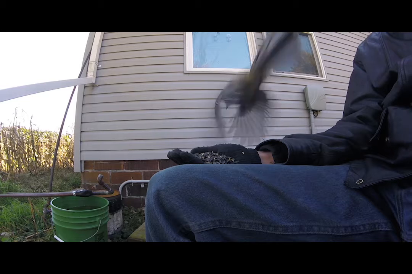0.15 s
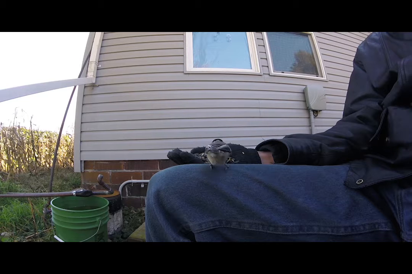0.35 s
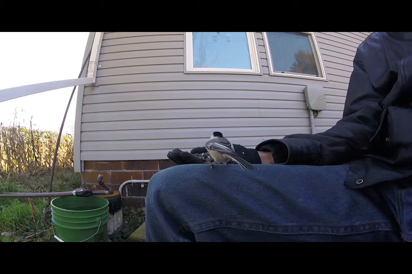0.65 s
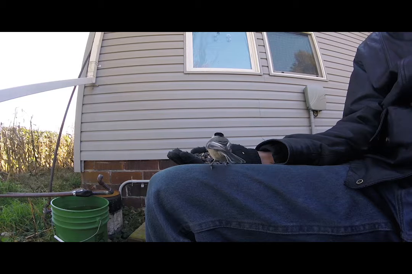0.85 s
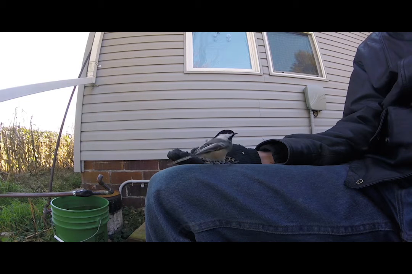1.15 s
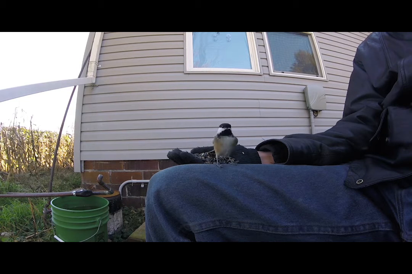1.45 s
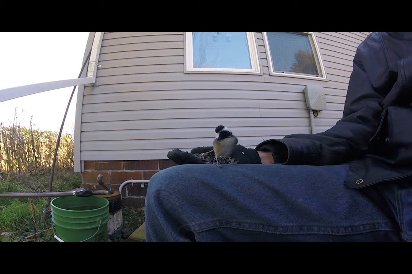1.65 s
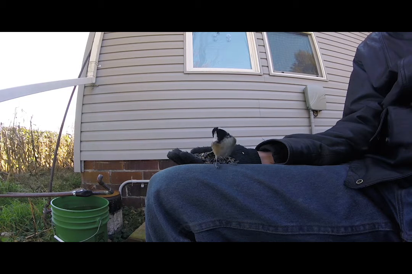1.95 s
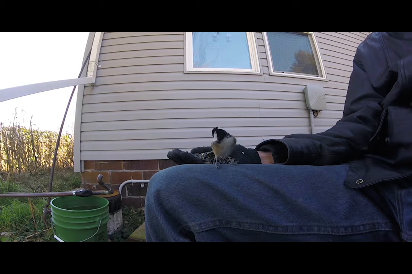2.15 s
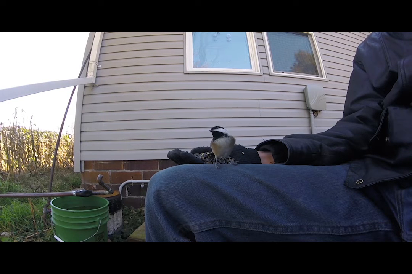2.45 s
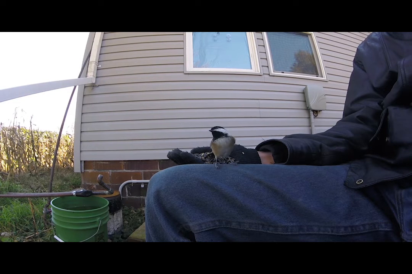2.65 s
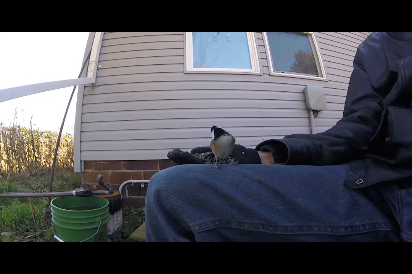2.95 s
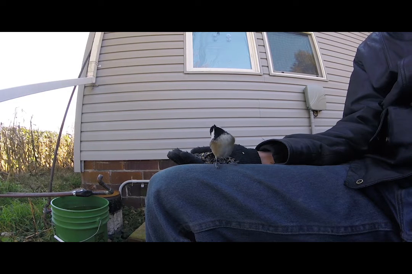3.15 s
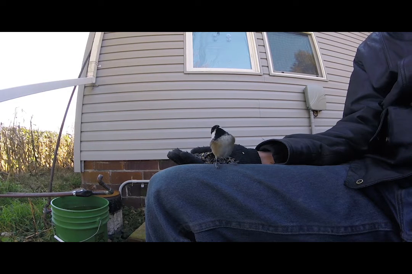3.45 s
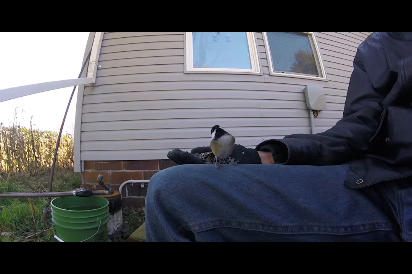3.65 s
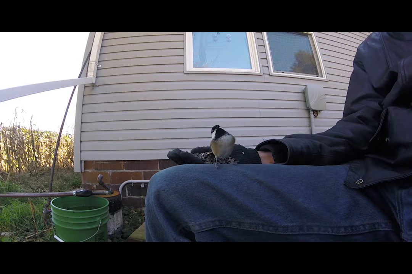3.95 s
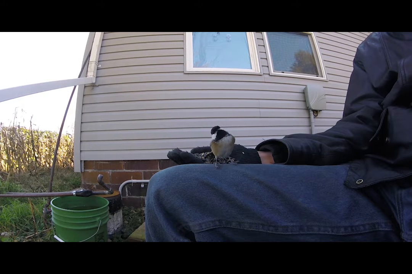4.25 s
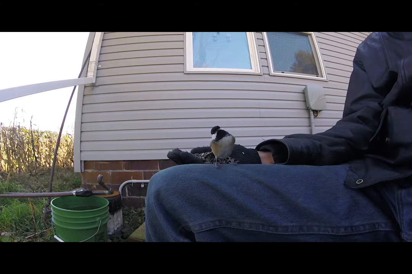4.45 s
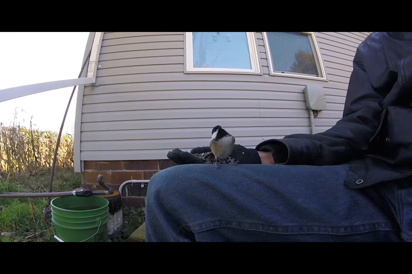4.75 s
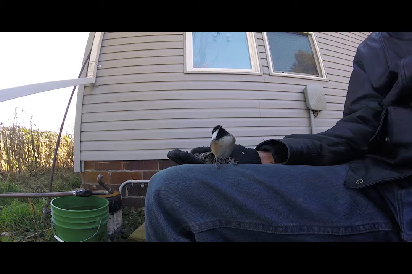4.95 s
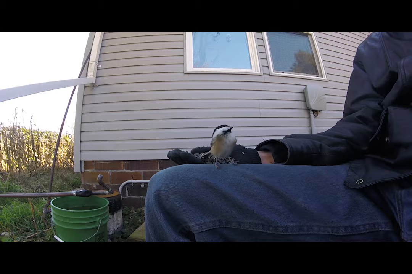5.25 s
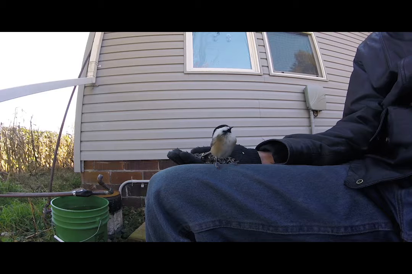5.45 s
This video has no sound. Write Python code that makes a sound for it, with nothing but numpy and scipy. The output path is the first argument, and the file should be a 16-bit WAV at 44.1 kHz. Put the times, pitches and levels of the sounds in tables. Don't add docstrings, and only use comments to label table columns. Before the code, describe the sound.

A soft flutter and bump near the microphone, followed by a bright fast bird trill and a long run of sharp, echoing chips in a quiet yard.

```python
import sys
import numpy as np
from scipy import signal
from scipy.fft import rfft, irfft, next_fast_len
from scipy.io import wavfile
from scipy.ndimage import uniform_filter1d, map_coordinates

SR = 44100
rng = np.random.default_rng(int(sys.argv[2]) if len(sys.argv) > 2 else 0)


def output_pcm(signal):
    pcm = np.clip(np.atleast_2d(signal).T, -1, 1) * 32767
    wavfile.write(sys.argv[1], SR, np.round(pcm).astype(np.int16))


def boost_factor(decibels):
    exponent = np.asarray(decibels, float) / 20
    return 10 ** exponent


N = 247401


def unit(x):
    return x / np.sqrt(np.mean(x ** 2) + 1e-20)


def filtered(x, response):
    m = next_fast_len(len(x) + 8192)
    return irfft(rfft(x, m) * response(np.fft.rfftfreq(m, 1 / SR)), m)[:len(x)]


def add(track, sound, s):
    start = max(round(s * SR), 0)
    track[start:start + len(sound)] += sound[:len(track) - start]


def glide(shape):
    s, hz, db = np.transpose(shape)
    t = np.arange(s[0], s[-1], 1 / SR)
    pitch = uniform_filter1d(np.exp(np.interp(t, s, np.log(hz))), size=45)
    return 2 * np.pi * np.cumsum(pitch) / SR, np.interp(t, s, db)


def whistle(shape, harmonic=1):
    phase, db = glide(shape)
    window = signal.windows.tukey(len(db), min(1, 130 / len(db)))
    return np.sqrt(2) * boost_factor(db) * np.sin(harmonic * phase) * window


def rough(note, depth_db, rate):
    knots = rng.standard_normal(200)
    return note * boost_factor(depth_db * map_coordinates(knots, [np.arange(len(note)) / SR * rate]))


# delay_s, level_db
WALL_RETURNS = [(.0112, -7.5), (.021, -10)]


def echoed(note, near_db, near_t60, far_db, far_t60, wall_db=-12, direct_db=0):
    t = np.arange(SR // 4) / SR
    draw = rng.standard_normal((2, len(t)))
    near = draw[0] * (abs(draw[0]) > 1.9) * boost_factor(-60 * t / near_t60) * (t > .002)
    far = draw[1] * boost_factor(-60 * t / far_t60) * (t > .008)
    paths = boost_factor(near_db) * near / np.linalg.norm(near) + boost_factor(far_db) * far / np.linalg.norm(far)
    paths[0] = boost_factor(direct_db)
    for delay, db in WALL_RETURNS:
        paths[round(delay * SR)] += boost_factor(db + wall_db)
    return signal.fftconvolve(note, paths)


# frequency_hz, density_db (per Hz)
YARD_SPECTRUM = [(12, -57), (22, -3), (38, -0.5), (58, 1), (90, -11.5), (130, -13), (200, -21),
                 (400, -25.5), (900, -28), (2500, -34.5), (4300, -41.5), (6500, -38.5), (9000, -39),
                 (10300, -45), (12000, -42.5), (14500, -50)]
# time_s, rumble_db
TRAFFIC_SWELL = [(0, 7), (.8, -1.5), (1.5, -1.5), (2.3, 0), (3, -0.5), (3.8, 0.5), (4.6, 2), (5.6, -1)]
# pitch_hz, level_db (rms)
MACHINE_HUM = [(734, -82), (856, -80), (979, -82)]


def yard():
    level_db, rumble_top_hz = -51.5, 160
    z = signal.stft(rng.standard_normal(N + 512), nperseg=512)[2]
    patches = uniform_filter1d(uniform_filter1d(rng.standard_normal(z.shape), 6, 0), 12, 1)
    noise = signal.istft(z * boost_factor(0.95 * unit(patches)), nperseg=512)[1][:N]
    hz, db = np.transpose(YARD_SPECTRUM)
    t = np.arange(N) / SR
    hum = sum(np.sqrt(2) * boost_factor(line_db) * np.sin(2 * np.pi * line_hz * t) for line_hz, line_db in MACHINE_HUM)
    air = unit(filtered(noise, lambda f: boost_factor(np.interp(np.log(f + 1), np.log(hz), db))))
    rumble = filtered(air, lambda f: 1 / (1 + (f / rumble_top_hz) ** 4))
    swell = boost_factor(np.interp(t, *np.transpose(TRAFFIC_SWELL)))
    return boost_factor(level_db) * (air + rumble * (swell - 1)) + hum


# peak_s, peak_db, pitch_hz, width_s
WING_GUSTS = [
    (.005, -26, 47, 0.017),
    (.038, -31.5, 49, 0.026),
    (0.111, -30, 26.6, 0.012),
    (0.228, -21.5, 29, 0.024),
    (0.281, -34.5, 29.3, 0.074),
    (0.344, -27, 86, 0.0094),
    (0.369, -31, 32, 0.023),
    (4.389, -32.5, 50.5, 0.014),
    (4.361, -42.5, 122.3, 0.0084),
    (4.56, -56, 54.4, 0.013),
]
# peak_s, level_db, centre_hz
FEATHER_BRUSHES = [(0.01, -37.5, 97), (0.094, -45.5, 86), (.189, -57, 133), (0.222, -42, 112),
                   (.09, -59.5, 453), (.217, -60, 400), (0.279, -59.5, 635), (0.255, -48, 89.5),
                   (0.287, -46, 84.5), (0.329, -52.5, 177), (0.34, -43.5, 124), (4.364, -51.5, 182)]
# peak_s, level_db, length_s, centre_hz
SEED_RUSTLES = [(.003, -61.5, 0.0052, 1840), (0.092, -64, 0.01, 1440), (0.195, -55, 0.00406, 1100),
                (0.205, -64.5, 0.01, 4400), (0.273, -51, 0.00023, 2300), (0.281, -56.5, 0.0026, 3180),
                (0.742, -65, 0.001, 4870), (0.849, -59.5, 0.0088, 3750), (0.882, -64, 0.018, 2940),
                (1.027, -60, 0.008, 3470), (1.288, -63, 0.0046, 2800), (2.886, -60, .002, 2800),
                (5.085, -64, 0.0024, 4008), (5.21, -70, 0.0018, 4000)]


def landing():
    brush_s = 0.012
    out, t = np.zeros(N), np.arange(N) / SR
    for s, db, hz, width in WING_GUSTS:
        out += boost_factor(db) * np.exp(-((t - s) / width) ** 2 / 2) * np.cos(2 * np.pi * hz * (t - s))
    t = t[:SR // 6]
    brushes = [(s, db, brush_s, hz) for s, db, hz in FEATHER_BRUSHES]
    for s, db, length, hz in brushes + SEED_RUSTLES:
        band = lambda f: np.exp(-(np.log((f + 1) / hz) / 0.61) ** 2)
        burst = unit(filtered(rng.standard_normal(len(t)), band))
        add(out, boost_factor(db) * burst * t / length * np.exp(1 - t / length), s - length)
    return out


# time_s, pitch_hz, level_db
PLUNGE_SHAPE = [(-.0035, 6753, 2.5), (-.0025, 6340, -2), (-.001, 5006, -3.5), (0, 4220, -9),
                (.0015, 3100, -1), (.004, 2404, -10)]


def swoop(plunge_db, hold_db, hz, sag, shape, throat, length, overtones_db, drop_db, top_hz, lower_db, upper_db):
    hold_middle_s, hold_half_s, drop_from_s = 0.038, 0.0227, .08
    s, ratio, db, loss_db = np.transpose(shape)
    ratio = ratio - sag / hz * np.clip(s - hold_middle_s, -hold_half_s, hold_half_s)
    s, db = s * length, db + drop_db * (s > drop_from_s)
    throat_hz, throat_db = np.transpose(throat)
    first_s, first_hz = PLUNGE_SHAPE[0][:2]
    note = 0
    for k in range(5):
        top = []
        for at, f, level in PLUNGE_SHAPE:
            raised_hz = f + (top_hz - first_hz) * (at / first_s) ** 2 * (at < 0)
            top.append((at, raised_hz, level + plunge_db + lower_db * (at >= 0) if k == 0 else -110))
        top[-1] = (*top[-1][:2], hold_db + 5.5 if k == 0 else -110)
        colour_db = np.interp(np.log((k + 1) * ratio * hz), np.log(throat_hz), throat_db)
        voice_db = overtones_db * (k > 0) + upper_db * (k > 2) - k * loss_db + colour_db
        tone = whistle(top + list(zip(s, ratio * hz, hold_db + db + voice_db)), harmonic=k + 1)
        note = note + rough(rough(tone, depth_db=1.2, rate=60), depth_db=1.5, rate=400)
    return note


# start_s, plunge_db, hold_db, hold_hz, sag_hz_per_s
SWOOP_CALLS = [(0.9245, -40, -75, 1840, 3003), (0.996, -41, -88, 1980, 3000),
               (1.063, -43, -62.5, 1840, 2193), (1.215, -42.5, -60, 1862, 2198),
               (1.3028, -42.5, -63.5, 1844, 3505), (1.3663, -41, -58.5, 1928, 399),
               (1.459, -43.5, -56, 1817, 4497), (1.6129, -40, -57, 1820, 3489),
               (1.7712, -41.5, -55.5, 1876, 2996), (1.9278, -44, -58.5, 1910, 2506),
               (2.088, -43.5, -56.5, 1897, 3498), (2.2445, -40.5, -57, 1863, 2995),
               (2.951, -43.5, -59, 1788, -400), (3.1518, -39, -75, 1970, 1003),
               (3.2315, -44, -58, 1896, 782), (3.3954, -45.5, -58, 1948, 1498),
               (3.5653, -42, -58, 1953, 1815), (3.727, -40.5, -60, 1990, 1802),
               (3.886, -41, -58.5, 1958, 1788), (4.044, -37.5, -56.5, 2032, 1496),
               (4.212, -43.5, -57.5, 1980, 2606)]
# length_ratio, overtones_db, final_drop_db
SWOOP_VOICES = [(1, 2, 0), (1, 0, 2), (0.902, -1, 5), (.98, 1.5, 3), (1, 0, 4), (0.999, -1, 0),
                (0.998, -3, -3), (1, -4, 0), (0.998, -3.5, -2), (1, -6, -7), (1, -8, -12), (1, -8, -9),
                (.78, -1.5, 0), (1, -8, 0), (1, 1, -4), (1, 0.5, -3), (1, -0.5, -4), (1, -0.5, 4),
                (0.999, -1, -2), (1.002, 0, -2), (1, 0, 0)]
# top_hz, lower_half_db, upper_overtones_db
PLUNGE_RUNS = [(8300, -8, 0), (7300, -7, 0), (6800, -6, -6), (6800, -2, 0), (6800, -4, -4), (6900, -2, 0),
               (6700, -3, -8), (6700, -4, -8), (6700, -6, -6), (6700, -4, -8), (6700, -5, -8),
               (6700, -5, -8), (6400, -4, -9), (7600, -5, 0), (6700, -3, -7), (6700, -3, -4),
               (6700, -3, -4), (6700, -3, -4), (6700, -3, -4), (6700, -3, -3), (6600, -3, -7)]
# time_s (from the plunge), pitch_ratio, level_db, loss_db (per overtone)
FIRST_HOLD = [(.01, 1.09, 1.5, 3.5), (.02, 1.015, 3.5, 8.5), (.04, 1.001, 2, 10.5), (.065, .99, -2.5, 4.5),
              (.072, .91, -2.5, 3.5), (.077, .75, -2, 2.5), (.085, .67, -9.5, 10), (.104, .63, -15, -2.5),
              (.109, 0.43, -16, 2)]
LATER_HOLD = [(.009, 1.06, 9.5, 11), (.018, 1.005, 2.5, 5.7), (.04, 1.001, 0, 2.5), (.066, .99, -1.5, 1.75),
              (.07, .95, 2.5, 1.4), (.076, .82, 1, 4), (.086, .69, 1.5, 7.4), (.091, 0.695, 7, 6.5)]
# frequency_hz, gain_db
FIRST_THROAT = [(1000, 4), (1900, -2.2), (2600, 9.5), (3700, -0.5), (4800, 10.5), (5600, 2), (7500, 11),
                (9500, 0)]
# frequency_hz, gain_db
LATER_THROAT = [(1300, -6.5), (1600, -21), (1830, -4), (2700, 3), (3900, -3), (5600, 0), (7500, 3),
                (9800, -6)]
# start_s, level_db
SWOOP_HOOKS = [
    (1.545, -60),
    (1.7, -62),
    (1.857, -63),
    (2.012, -59),
    (2.17, -60.5),
    (2.332, -58),
]
# time_s, pitch_hz, level_db
HOOK_COURSE = [(-.003, 2570, -8), (.002, 2213, 2.5), (.008, 1980, 1), (.016, 1900, -9), (.021, 1910, -16)]


def swoops():
    ground_s, ground_db = 0.0049, -8
    out = np.zeros(N)
    space = dict(near_db=-7.5, near_t60=0.03, far_db=-12, far_t60=0.41)
    for (s, *call), voice, run in zip(SWOOP_CALLS, SWOOP_VOICES, PLUNGE_RUNS):
        bird = (FIRST_HOLD, FIRST_THROAT) if s < N / SR / 2 else (LATER_HOLD, LATER_THROAT)
        start = s + PLUNGE_SHAPE[0][0]
        add(out, echoed(swoop(*call, *bird, *voice, *run), **space), start)
        add(out, boost_factor(ground_db + call[0]) * whistle(PLUNGE_SHAPE[:4]), start + ground_s)
    for s, db in SWOOP_HOOKS:
        add(out, boost_factor(db) * echoed(whistle(HOOK_COURSE), **space), s + HOOK_COURSE[0][0])
    return out


# start_s, length_s, level_db, lowest_hz, swing_hz, blur_hz
BUZZ_CALLS = [
    (1.107, 0.086, -50, 6530, 2380, 145),
    (2.494, 0.068, -59.5, 7400, 2040, 700),
    (2.996, 0.15, -61.5, 7360, 2250, 830),
    (3.503, 0.09, -59.5, 7160, 2310, 680),
    (1.91, 0.051, -68.5, 7260, 3360, 604),
    (4.661, 0.066, -64.5, 7760, 1835, 583),
]


def buzzes():
    rate = 80
    out = np.zeros(N)
    for s, length, db, hz, swing_hz, blur_hz in BUZZ_CALLS:
        t = np.arange(0, length, 1 / SR)
        cycle = (rate * t) % 1
        size = boost_factor(3 * rng.standard_normal(30))[(rate * t).astype(int)]
        blur = blur_hz * unit(uniform_filter1d(rng.standard_normal(len(t)), size=60))
        pitch = hz + swing_hz * cycle ** 1.1 + blur
        sweep = np.sin(2 * np.pi * np.cumsum(pitch) / SR) * np.sin(np.pi * cycle ** .4) ** 2
        swell = np.sin(np.pi * t / length) ** .4
        call = boost_factor(db) * size * swell * rough(sweep, depth_db=5, rate=500)
        add(out, echoed(call, near_db=-2.5, near_t60=.1, far_db=-3, far_t60=.3), s)
    return out


# start_s, fall_db, rise_db, rise_hz
TRILL_SYLLABLES = [(1.5238, -36.5, -32, 4486), (1.5904, -28, -29, 4520), (1.654, -27, -30, 4450),
                   (1.7184, -28, -28, 4480), (1.7832, -26.5, -29.5, 4527), (1.8479, -26.5, -31, 4480),
                   (1.9145, -28, -32, 4470), (1.9817, -29, -30.5, 4460), (2.0519, -27, -36, 4530),
                   (2.1218, -26, -30, 4624), (2.192, -27, -33, 4620), (2.2614, -27.5, -33, 4530),
                   (2.3332, -27.5, -33.5, 4560), (2.4057, -27.5, -29.5, 4700), (2.4805, -29, -27.5, 4660),
                   (2.5549, -30, -32, 4560), (2.6283, -30.5, -35.5, 4620), (2.707, -32, -37.5, 4560),
                   (2.796, -39.5, -39.5, 4570)]
# lead_in_db, early_swell_db, flick_db, closes_early_s
SYLLABLE_SHAPES = [(-1, -1, -9, .0001), (-4, -2, -3, 0.000079), (-2, 3.5, 0, .0001),
                   (-1, -5.5, -1.5, .0001), (0, 0, -2, 0.00017), (2, 0.5, -2, 0.00016), (2.5, 1, -4, .0001),
                   (-3, 2.5, -5.5, .0001), (-1, 4.5, -7, .0001), (-1, -4.5, -2.5, .0001),
                   (0, 1.5, -3, .0001), (-5, 0.5, -4, .0001), (-7, 0, -0.5, .0001), (-5, 6, 0.5, 0.0004),
                   (-8.5, -3, -1, .001), (-3, -3.5, -1.5, .001), (-2, 0, -4, 0.0018), (-1, -1, 1.5, 0.0053),
                   (-2, 0.5, 2, 0.0071)]
# time_s, pitch_ratio, level_db
FALLING_NOTE = [(-.012, 1.08, -29), (-.008, 1.031, -13.5), (-.003, 1.0084, -5), (.003, .995, -3.5),
                (.006, .985, -6), (0.009, 0.96, -41)]
# time_s, pitch_ratio, level_db
RISING_NOTE = [(-.031, 0.666, -26.5), (-.027, .75, -23), (-.023, .86, -29), (-.019, .99, -20),
               (-.014, 1.005, -10.5), (-.007, 1.005, -7.5), (-.002, 1.015, -3), (.001, 1.04, -9),
               (.004, 1.2, -24)]
# time_s, pitch_hz, level_db
CLOSING_FLICK = [(-.004, 6980, -15), (-.002, 6449, -13), (0, 6310, -4), (.002, 6050, 1), (.0035, 5660, -26)]


def trill():
    base_hz, sag_hz_per_s = 5105, 64
    weak_from_db, flat_hz_per_db, level_per_db = -36.5, 157, .7
    level_at_first, climb_from_s = 3.5, 0.51
    rise_lag_s, lag_growth, flick_base_db, flick_sinks_per_s = .0325, 0.0048, -43, 0.048
    lead_ends_s, swell_ends_s = -.02, -.006
    out = np.zeros(N)
    space = dict(wall_db=-7, near_db=-10.5, near_t60=0.06, far_db=-17, far_t60=0.37)
    fall_space = dict(wall_db=-8.5, near_db=-12.5, near_t60=0.037, far_db=-19.5, far_t60=0.4)
    rows = np.column_stack([TRILL_SYLLABLES, SYLLABLE_SHAPES])
    for s, fall_db, rise_db, rise_hz, lead_db, swell_db, flick_db, early_s in rows:
        sung, weak_db = s - TRILL_SYLLABLES[0][0], max(weak_from_db - fall_db, 0)
        fall_hz = base_hz - sag_hz_per_s * sung - flat_hz_per_db * weak_db
        fall = [(at, fall_hz * ratio ** (1 - level_per_db * weak_db), db) for at, ratio, db in FALLING_NOTE]
        held = level_at_first * max(1 - sung / climb_from_s, 0)
        rise = []
        for at, ratio, db in RISING_NOTE:
            change_db = lead_db if at < lead_ends_s else swell_db * (at < swell_ends_s)
            rise.append((at, rise_hz * (ratio - held * max(at + 0.0041, -.014)), db + change_db))
        close = s + rise_lag_s + lag_growth * sung - early_s
        falling = rough(whistle(fall), depth_db=0.2, rate=190)
        rising = rough(whistle(rise[3:]), depth_db=1.0, rate=127)
        lead_in = rough(whistle(rise[:4]), depth_db=5, rate=430)
        flick = whistle(CLOSING_FLICK, harmonic=1.02 - flick_sinks_per_s * sung)
        add(out, boost_factor(fall_db) * echoed(falling, **fall_space), s + FALLING_NOTE[0][0])
        add(out, boost_factor(rise_db) * echoed(rising, **space), close + RISING_NOTE[3][0])
        add(out, boost_factor(rise_db) * echoed(lead_in, **space), close + RISING_NOTE[0][0])
        add(out, boost_factor(flick_base_db + flick_db) * echoed(flick, **space), close + CLOSING_FLICK[0][0])
    # time_s, pitch_hz, level_db
    afternote = [(0, 5850, -64), (.012, 5760, -66), (.034, 5680, -70)]
    add(out, echoed(rough(whistle(afternote), depth_db=2.5, rate=200), **space), 2.834)
    return out


# start_s, level_db
CHIP_CALLS = [(2.4, -44.5), (2.4426, -49), (2.4823, -50), (2.517, -48), (2.563, -45), (2.606, -47),
              (2.6493, -45), (2.695, -52), (2.7385, -40.5), (2.7786, -44), (2.8252, -53), (2.8675, -53.5),
              (2.912, -51), (2.955, -49.5), (3.003, -43.5), (3.056, -43.5), (3.101, -43.5), (3.1502, -40),
              (3.19, -47),
              (3.246, -46.5), (3.2926, -49.5), (3.3375, -43.5), (3.382, -46), (3.4263, -46),
                (3.475, -46.5), (3.523, -49), (3.575, -57), (3.6224, -45.5), (3.6674, -42), (3.7144, -43.5),
                (3.763, -34.5), (3.806, -38.5), (3.852, -47.5), (3.901, -40.5), (3.948, -38.5),
                (3.993, -41), (4.0404, -40.5), (4.088, -41.5), (4.1365, -38.5), (4.1871, -37.5),
                (4.234, -42.5), (4.281, -43),
              (4.328, -35), (4.385, -29.5), (4.4342, -35.5), (4.486, -31), (4.539, -42.5), (4.592, -43.5),
             (4.646, -47), (4.6973, -41), (4.7457, -47), (4.8016, -44), (4.851, -42), (4.941, -35),
             (4.9962, -39.5), (5.052, -72), (5.094, -39.5), (5.164, -55), (5.2295, -57), (5.306, -55),
             (5.329, -43.5), (5.382, -41.5), (5.431, -45.5), (5.4805, -44), (5.535, -42.5), (5.5924, -41)]
# lead_in_db, climb_db
CHIP_VOICES = [(-4, -3), (3, 0), (-5, 0), (-4, 3), (-11, 0), (-6, 0), (2, 1), (0, 1), (-4, -5), (-1, 2),
               (-2.5, -4), (-2, 5.5), (-3, 6.5), (-5, 2), (-3, -3), (-4, -1), (-6, 1), (2, -10), (-1, -1),
               (0, 0), (-2, 3), (-1, -5.5), (-2, -3), (-2, 1.5), (1.5, 2), (8, 3), (0, 0), (3, 0),
                  (3, 0), (4.5, 2), (4, 1.5), (4, -5), (2.5, -1), (5, 0), (0, -10), (-3, -0.5), (-1, -2),
                  (-5.5, 0), (-5, 1.5), (-2.5, -2), (-3, 4), (-6, -3),
               (-0.37, -5), (0.38, -14), (0, -5), (0, -6.5), (2.2, -1), (2, 5), (0.46, 4), (0, 2.5),
               (-0.27, 4.5), (0, 2.5), (-0.2, -3), (0, -6.5), (0, -0.5), (0, 0), (0, 2.5), (0, 0), (0, -3),
               (0, -13), (-2, 5), (-2, 2.5), (-2, 4.5), (-2.2, 4.5), (-2, -1), (-1.8, -0.5)]
# time_s, lowest_hz, high_lead_in_db
CHIP_DRIFT = [(2.4, 6370, -59), (2.85, 6440, -50), (3.15, 6380, -48), (3.75, 6420, -58), (4.2, 6420, -43),
              (4.33, 6350, -49), (4.5, 6420, -55.5), (4.65, 6390, -51), (4.86, 6400, -52),
              (4.94, 6220, -52.5), (5.1, 5980, -55), (5.16, 6670, -71), (5.31, 6870, -72),
              (5.328, 5720, -48), (5.39, 6130, -49), (5.53, 6230, -51)]
# time_s, echo_db
CHIP_ECHOES = [(2.4, -3), (3.6, -0.5), (4, -0.5), (4.4, -5), (5.1, -2), (5.4, -1)]
# time_s, pitch_hz, level_db
BEAK_SNAP = [(0, 5200, -17), (.0015, 3200, 4.5), (.003, 2030, 22.5)]


def chatter():
    start_top_hz, top_sinks_hz_per_s, scatter_hz = 9027, 196, 59.6
    beak_base_db, beak_scatter_db = -68.5, 2
    out = np.zeros(N)
    when, lowest_hz, lead_in_db = np.transpose(CHIP_DRIFT)
    chips = CHIP_CALLS
    voices = CHIP_VOICES
    for (s, db), (top_db, climb_db) in zip(chips, voices):
        echo_db = np.interp(s, *np.transpose(CHIP_ECHOES))
        hz = np.interp(s, when, lowest_hz) + scatter_hz * rng.standard_normal()
        lead_db = min(np.interp(s, when, lead_in_db) + top_db - db, -1.5)
        top_hz = start_top_hz - top_sinks_hz_per_s * (s - when[0])
        drop = [(-.005, 1.023 * top_hz, lead_db - 9.5), (-.0035, top_hz, lead_db + 5.5),
                (-.002, .9 * top_hz, lead_db + 0.5), (-.0005, 1.07 * hz, lead_db + 9.5)]
        turn = [(.002, .965 * hz, 0), (.004, .96 * hz, 1.5), (.0065, .99 * hz, climb_db - 2)]
        climb = [(.009, 1.03 * hz, climb_db + 1.5), (.012, 1.3 * hz, climb_db - 13),
                 (.015, 1.16 * hz, climb_db - 6), (.018, 0.95 * hz, -35)]
        chip = rough(whistle(drop + turn + climb), depth_db=3.0, rate=415)
        space = dict(wall_db=echo_db - 6.5, direct_db=-1, near_db=echo_db - 1.5, near_t60=0.035,
                     far_db=-15.0, far_t60=0.51)
        add(out, boost_factor(db - 11) * echoed(chip, **space), s + drop[0][0])
        beak_db = beak_base_db + 0.35 * (db + 35.5) + beak_scatter_db * rng.standard_normal()
        add(out, boost_factor(beak_db) * whistle(BEAK_SNAP), s - .013)
        add(out, boost_factor(db - 34.0) * whistle(turn, harmonic=0.49), s + turn[0][0])
    return out


# start_s, level_db, pitch_hz, octave_db
THROAT_CLUCKS = [(4.579, -61, 2550, -1), (4.635, -63, 2340, 2), (4.686, -60, 2380, -3),
                 (4.79, -57, 2400, -4), (4.842, -66, 2520, -2), (4.929, -68, 2950, 2),
                 (4.943, -59, 3050, -8), (4.982, -59, 2680, -14), (5.083, -60, 2670, -12),
                 (5.318, -65, 3100, -8), (5.338, -57, 2930, -12), (5.455, -70, 2480, 10)]
# time_s, pitch_ratio, level_db
CLUCK_COURSE = [(-.003, 1.13, 0), (0, 1, -5.5), (.003, .93, -8)]


def clucks():
    out = np.zeros(N)
    for s, db, hz, octave_db in THROAT_CLUCKS:
        shape = [(at, hz * ratio, level) for at, ratio, level in CLUCK_COURSE]
        cluck = whistle(shape) + boost_factor(octave_db) * whistle(shape, harmonic=2)
        add(out, boost_factor(db) * cluck, s + shape[0][0])
    return out


def scene():
    return (yard() + landing() + swoops() + buzzes() + trill() + chatter() + clucks())[None]


# from_s, edge_hz
UPPER_EDGE = [(0, 13600), (.25, 14500), (.9, 13200), (2.08, 14500), (3.14, 13300)]


def thinned(x, above_hz, keep):
    starved_low_hz, starved_high_hz, starved_share = 9800, 10350, .36
    hz, t, z = signal.stft(x, SR, nperseg=1024)
    s, edge_hz = np.transpose(UPPER_EDGE)
    wander = 220 * unit(uniform_filter1d(rng.standard_normal(len(t)), size=4))
    edge = edge_hz[np.searchsorted(s, t, side="right") - 1] + wander
    usual = 1.8 * np.percentile(abs(z), 20, axis=1, keepdims=True)
    weak = (hz[:, None] > above_hz) & (uniform_filter1d(abs(z), size=3, axis=0) < keep * usual)
    thrift = uniform_filter1d(rng.standard_normal(len(t)), size=5)
    starved = (hz > starved_low_hz) & (hz < starved_high_hz)
    weak |= starved[:, None] & (thrift < np.quantile(thrift, starved_share / 2))
    return signal.istft(z * ~weak * (hz[:, None] < edge), SR, nperseg=1024)[1][:N]


# centre_hz, width_hz, gain_db
PORT_RINGS = [(6490, 297, 8), (7540, 2210, -1)]


def housed(x):
    cavity = (4280, -400, -7.5)  # centre_hz, width_hz (negative swallows), depth_db

    def port(f):
        return 1 + sum(boost_factor(db) * 1j * f * w / (c * c - f * f + 1j * f * abs(w))
                       for c, w, db in PORT_RINGS + [cavity])
    return filtered(x, port)


def band_limit(x):
    return signal.sosfilt(signal.butter(12, 14800, fs=SR, output="sos"), x)


def record(dry):
    heard = thinned(housed(dry[0]), above_hz=3400, keep=.5)
    heard = thinned(heard, above_hz=9300, keep=.95)
    return band_limit(heard[None])


dry = scene()
out = record(dry)
output_pcm(out)
```